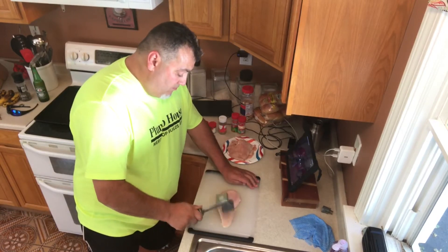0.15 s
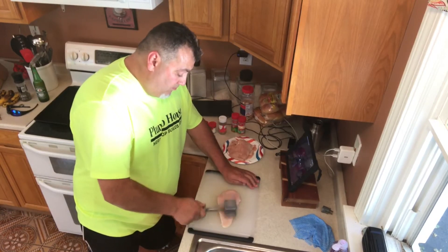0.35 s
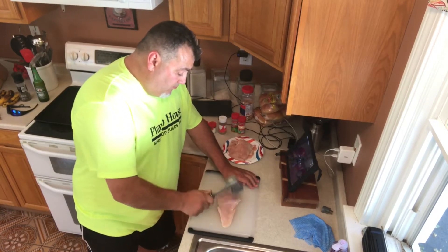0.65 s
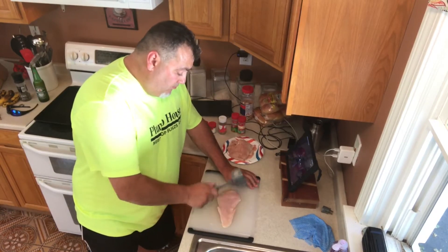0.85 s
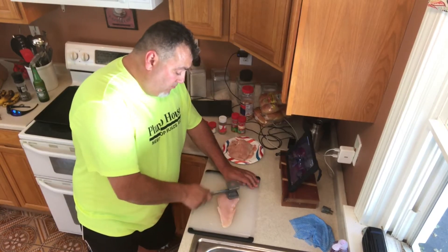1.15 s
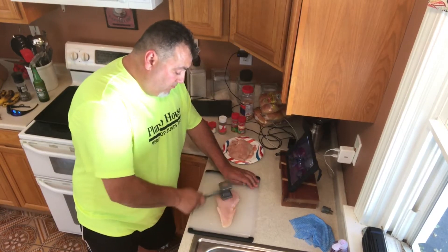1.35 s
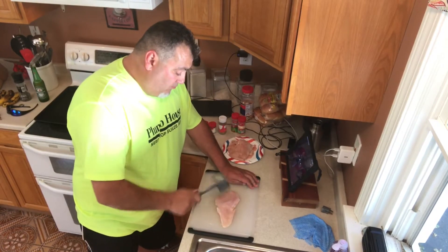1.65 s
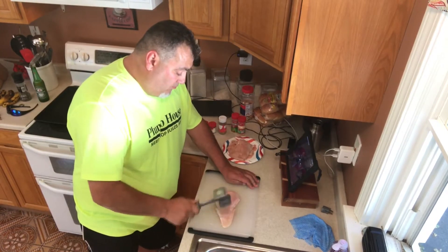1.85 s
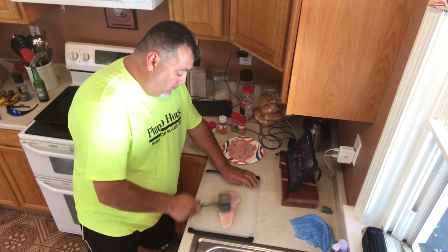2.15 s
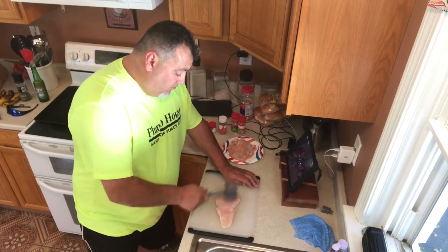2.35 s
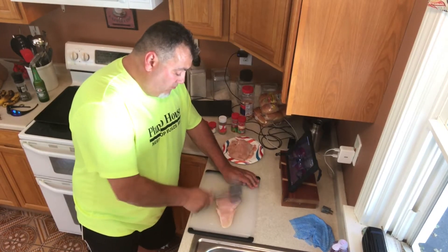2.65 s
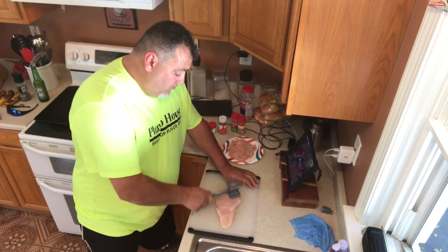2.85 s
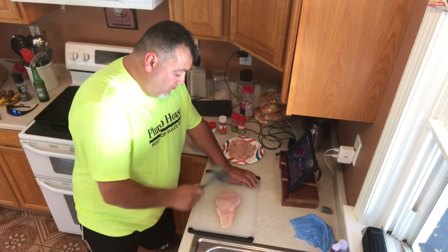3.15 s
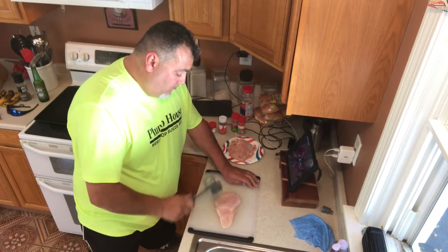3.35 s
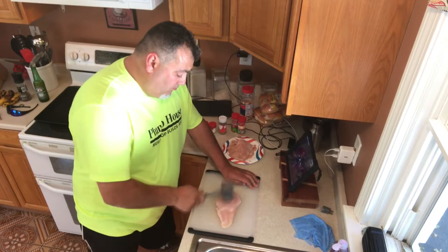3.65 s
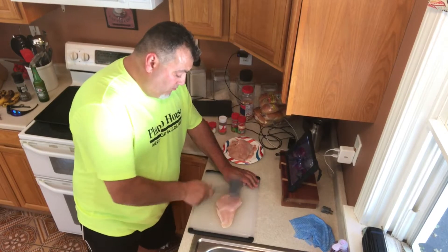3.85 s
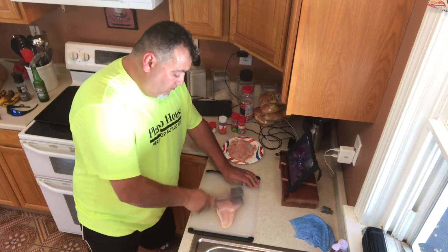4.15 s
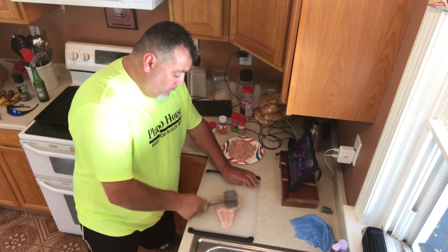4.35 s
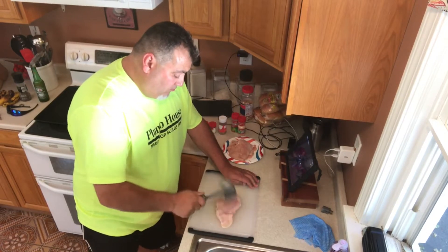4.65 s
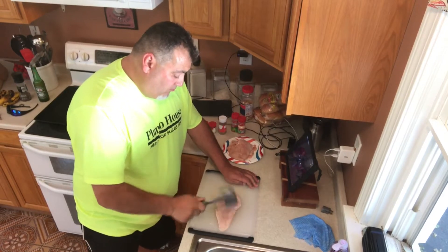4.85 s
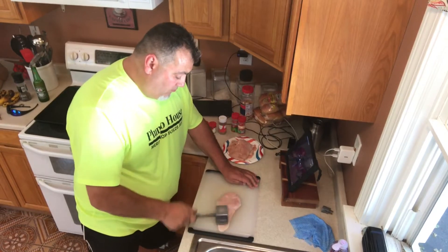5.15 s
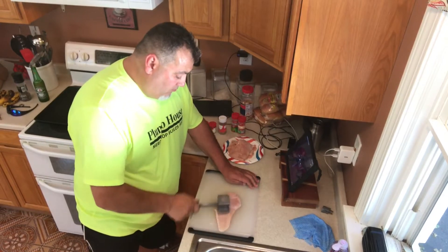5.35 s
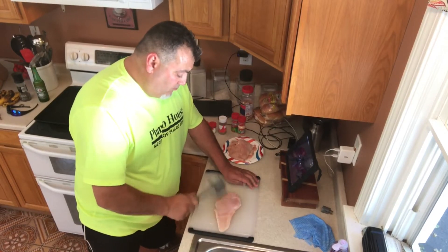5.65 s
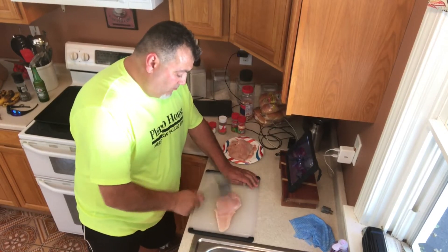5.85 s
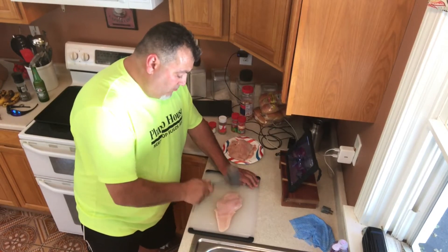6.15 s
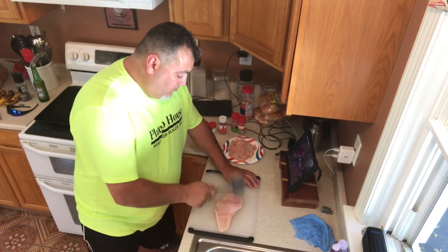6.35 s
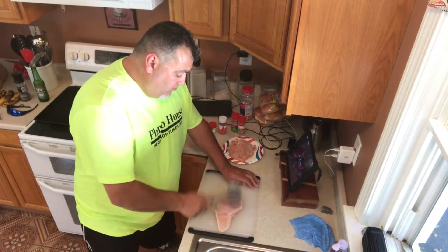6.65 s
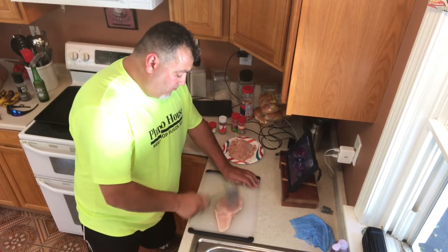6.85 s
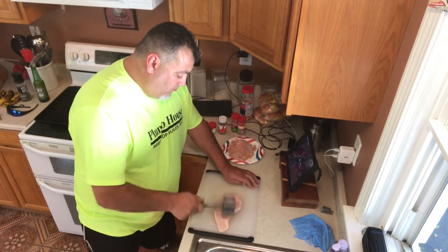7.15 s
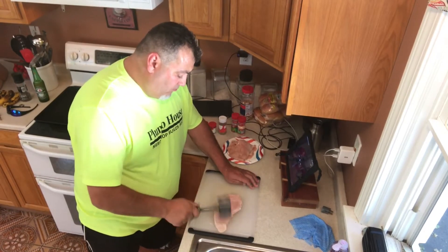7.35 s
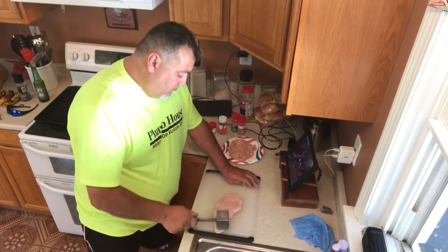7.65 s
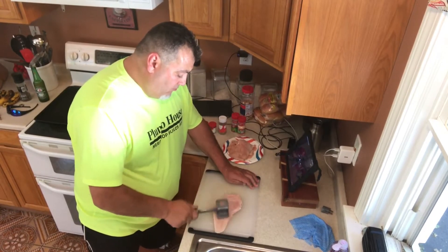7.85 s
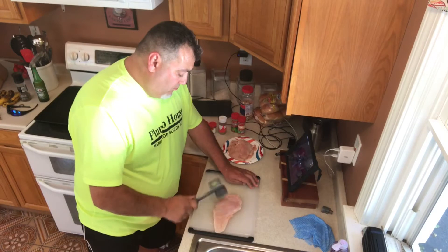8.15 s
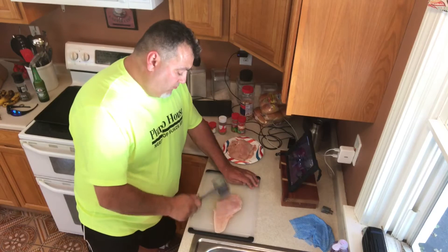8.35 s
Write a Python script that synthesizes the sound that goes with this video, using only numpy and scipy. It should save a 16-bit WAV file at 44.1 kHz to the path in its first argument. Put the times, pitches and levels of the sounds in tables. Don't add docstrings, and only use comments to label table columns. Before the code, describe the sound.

The scene opens on the ringing tail of an earlier blow, and at about 0.1 seconds the next strike lands. A metal meat mallet then pounds raw chicken on a plastic cutting board at roughly five blows a second, nearly regular, through to 8.5 seconds. Every hit combines a wet slap and bright crack, a tiny splashy tick, a hard mid-pitched board knock with quick chatter and rebound, and a short low thud from the counter and cabinet. Loudness and pitch shift slightly from blow to blow. The hits are strongest and wettest around 3.8 to 4.2 seconds, remain firm until about 7, then several become weaker and duller, notably near 7.5, with a brighter hit around 8.3. The microphone is close above the worktop, peaks compressed and extreme treble muted, with faint kitchen reflections and low room hiss between blows.

```python
import sys
import numpy as np
from scipy import signal
from scipy.fft import rfft, irfft, next_fast_len
from scipy.io import wavfile
from scipy.ndimage import uniform_filter1d

SR = 44100
rng = np.random.default_rng(int(sys.argv[2]) if len(sys.argv) > 2 else 0)


def gain_from_decibels(decibels):
    exponent = np.asarray(decibels, float) / 20
    return 10 ** exponent


def to_wav(sig):
    pcm = np.clip(np.atleast_2d(sig), -1, 1) * 32767
    pcm = np.round(pcm).astype(np.int16)
    wavfile.write(sys.argv[1], SR, pcm.T)


N = 374850
LEAD = SR // 5
LONG = N + LEAD
USUAL_CRACK_DB = -13


def colour(x, points):
    size = next_fast_len(len(x))
    hz, db = np.transpose(points)
    bins = np.maximum(np.arange(size // 2 + 1) * SR / size, 1)
    gain = gain_from_decibels(np.interp(np.log(bins), np.log(hz), db))
    return irfft(rfft(x, size) * gain, size)[:len(x)]


def ring(modes, gains, seconds):
    hz, db, t60 = np.transpose(modes)[:, :, None]
    t = np.arange(int(seconds * SR)) / SR
    decay = 1000. ** (-t / t60)
    return np.sum(gains[:, None] * gain_from_decibels(db) * np.sin(2 * np.pi * hz * t) * decay, axis=0)


def add(out, s, sound):
    at = LEAD + int(s * SR)
    out[at:at + len(sound)] += sound[:LONG - at]


def contacts(seconds, density, rise=0.00051):
    t = np.arange(SR // 20) / SR
    clicks = rng.standard_normal(len(t)) * np.exp(-rng.random(len(t)) / density)
    return clicks / np.std(clicks) * np.exp(-(t / seconds) ** 2) * (1 - np.exp(-t / rise))


# (frequency [Hz], level [dB per Hz])
AIR = [(28, -96), (45, -78), (160, -74), (500, -82), (1200, -80), (4000, -90), (9000, -102), (16000, -106)]


def room_air():
    return colour(rng.standard_normal(LONG), AIR) * np.sqrt(SR / 2)


# (frequency [Hz], level [dB], t60 [s])
KITCHEN = [(246, 7.5, 0.29), (455, 3.5, 0.4), (1100, -2.5, 0.44), (2240, -1, 0.43), (4350, -1, 0.47),
           (7800, -4, 0.41), (16000, 0, 0.22)]


def kitchen(x):
    size = next_fast_len(LONG)
    bins = np.maximum(np.arange(size // 2 + 1) * SR / size, 1)
    given, chance = rfft(x, size), rfft(rng.standard_normal(size))
    table_hz, table_db, table_t60 = np.transpose(KITCHEN)
    fill = np.exp(-1 / (0.0025 * SR))
    out = 0
    for hz in 250 * 2 ** np.arange(0, 6.3, .4):
        share = np.cos(np.pi / 2 * np.clip(np.log2(bins / hz) / .4, -1, 1))
        db = np.interp(np.log(hz), np.log(table_hz), table_db)
        t60 = np.interp(np.log(hz), np.log(table_hz), table_t60)
        keep = np.exp(-2 * np.log(1000) / (t60 * SR))
        power = irfft(given * share, size) ** 2
        energy = signal.lfilter([1 - fill], np.convolve([1, -keep], [1, -fill]), power)
        noise = irfft(chance * share, size)
        clumps = np.repeat(rng.standard_normal(size // 800 + 1), 800)[:size]
        clumps = uniform_filter1d(clumps, size=800)
        out = out + gain_from_decibels(db + 1.95 * clumps) * np.sqrt(np.abs(energy)) * noise / np.std(noise)
    return out[:LONG]


# (frequency [Hz], level [dB], t60 [s])
PANEL = [(197.2, 3, 0.57), (444.7, -8.5, 0.78)]


def loose_panel(ring_s):
    free_s, swell_s = 0.063, 0.0075
    panel = ring(PANEL, np.ones(len(PANEL)), ring_s)
    t = np.arange(len(panel)) / SR
    panel = panel * (0.14 + 0.85 / (1 + np.exp((t - free_s) / 0.003)))
    return panel * (1 - np.exp(-t / swell_s))


# (frequency [Hz], level [dB], t60 [s])
FLOOR_MODES = [(50.6, -3.5, 0.41), (61, -17, .3), (73.1, 3, 0.14), (87.3, -17, 0.72), (117, -0.5, 0.17)]


def deep_room(ring_s):
    deep = ring(FLOOR_MODES, np.ones(len(FLOOR_MODES)), ring_s)
    t = np.arange(len(deep)) / SR
    return deep * (1 - np.exp(-(t / 0.0064) ** 2))


# (frequency [Hz], level [dB], t60 [s])
CABINET = [(166.4, 0, 0.44), (240, 9.5, 0.034), (260.4, -12, 0.16), (331, -11.5, 0.14), (392, -14.5, 0.53),
           (538, -3, 0.45)]


def cabinet_thuds(rows):
    ring_s, door_hz = .35, 125
    thuds = np.zeros(LONG)
    panel, deep = loose_panel(ring_s), deep_room(ring_s)
    doors = signal.butter(2, door_hz, "high", fs=SR, output="sos")
    push = np.hanning(int(0.0021 * SR))
    settle = int(.0085 * SR)
    for s, _, _, thud_db, _ in rows:
        force = np.zeros(SR // 40)
        force[:len(push)] += push
        force[settle:settle + len(push)] += 1.5 * gain_from_decibels(1.5 * rng.standard_normal()) * push
        cabinet = ring(CABINET, gain_from_decibels(0.92 * rng.standard_normal(len(CABINET))), ring_s)
        cabinet = signal.sosfilt(doors, cabinet + panel) + deep
        thud = signal.fftconvolve(force, cabinet)
        add(thuds, s + 0.0014, gain_from_decibels(thud_db + 6.0) * thud / np.abs(thud).max())
    return thuds


# (frequency [Hz], level [dB], t60 [s])
BOARD = [(770, -11, 0.072), (925, -10, 0.12), (964, -16, 0.051), (1051, -2, 0.042), (1110, -1, 0.071),
         (1210, 7, 0.025), (1330, -2.5, 0.051), (1418, 2.5, 0.033), (1590, -5, 0.019), (1817, -13.5, 0.083),
         (2246, -6, 0.015), (2440, -8.5, 0.024)]


def board_knocks(rows):
    chatter_base_s, chatter_s_per_db = 0.0074, 0.16
    rebound_s, rebound_db = .007, -5
    knocks = np.zeros(LONG)
    board_hz = np.array(BOARD)[:, 0]
    for s, db, crack_db, _, hz in rows:
        chatter_s = chatter_base_s + chatter_s_per_db * (crack_db - db - USUAL_CRACK_DB)
        chatter = contacts(np.clip(chatter_s, .004, .014), density=0.54, rise=0.0021)
        rebound = contacts(0.0058, density=0.38, rise=0.0011)
        chatter = chatter + gain_from_decibels(rebound_db) * np.roll(rebound, int(rebound_s * SR))
        near = gain_from_decibels(-7 * np.minimum(np.abs(np.log2(board_hz / hz)) / 0.081, 1))
        board = ring(BOARD, near * gain_from_decibels(2.3 * rng.standard_normal(len(BOARD))), .1)
        knock = np.diff(signal.fftconvolve(chatter, board))
        add(knocks, s - .0016, gain_from_decibels(db + 17) * knock / np.linalg.norm(knock))
    return knocks


def wet_cracks(rows):
    cracks = np.zeros(LONG)
    tone = [(500, -45), (2000, 2), (4000, 8.5), (7000, 3), (12000, -13)]
    for s, _, crack_db, _, _ in rows:
        crack = colour(contacts(.016, density=0.078, rise=0.00067), tone)
        add(cracks, s - .0008, gain_from_decibels(crack_db - 1.0) * crack)
    return cracks


# (frequency [Hz], level [dB], t60 [s])
FLESH = [(361, 10.5, 0.037), (471, 3, 0.11), (578, -2, 0.13), (687, -14.5, 0.039), (729.4, 6.5, 0.065)]


def slaps(rows):
    touch_lead_s, lead_s_per_db = 0.0018, .0005
    smack_base_db, smack_per_crack = -20, 0.63
    bright, dull = np.zeros(LONG), np.zeros(LONG)
    slab = ring(FLESH, np.ones(len(FLESH)), .15)
    for s, _, crack_db, _, _ in rows:
        touch = s - touch_lead_s - lead_s_per_db * max(USUAL_CRACK_DB - crack_db, 0)
        add(bright, touch, gain_from_decibels(crack_db + 16.5) * contacts(0.0018, density=0.13))
        add(bright, touch, gain_from_decibels(crack_db + 10.5) * contacts(0.012, density=0.058))
        smack = signal.fftconvolve(contacts(0.014, density=0.4, rise=0.0029), slab)
        smack_db = smack_base_db + smack_per_crack * (crack_db - USUAL_CRACK_DB)
        add(dull, s, gain_from_decibels(smack_db + 26.5) * smack / np.linalg.norm(smack))
    edge = [(2000, -30), (6000, -16), (10000, 0), (16000, 0)]
    return colour(bright, edge) + dull


# (time [s], knock level [dB], wet crack level [dB], thud level [dB], board pitch [Hz])
EARLIER_BLOW = [
    (-.09, -3, -15, -16, 1200),
]
FIRST_BLOWS = [(0.085, 0.5, -17.5, -18.5, 1100), (0.253, 2.5, -14.5, -14, 1210),
               (0.417, 1.5, -12, -14.5, 1340), (0.579, 0.5, -13, -15.5, 1270), (0.751, 1.5, -10, -15, 1080),
               (0.961, 0, -13, -17, 1370), (1.179, 1.5, -12.5, -18, 1165), (1.382, -1.5, -10.5, -18.5, 1070),
               (1.59, 2, -10.5, -16, 1060), (1.789, -1.5, -15.5, -18.5, 1110),
               (1.98, 1.5, -13.5, -15.5, 1110), (2.171, 1, -13.5, -19, 1200), (2.352, -3, -16, -20.5, 1450),
               (2.532, 2.5, -9.5, -16, 1040), (2.728, 3, -9.5, -16, 1450), (2.911, -0.5, -12, -20, 1020),
               (3.099, 0, -10.5, -17.5, 1210), (3.284, 1, -10, -15.5, 1190), (3.47, 2, -13.5, -19.5, 1210),
               (3.658, -2, -13.5, -19.5, 1270), (3.838, 3.5, -11.5, -16, 1210),
               (4.028, 3.5, -8.5, -18, 1100), (4.222, 1.5, -7, -15, 1050)]
LATER_BLOWS = [(4.416, 1, -12.5, -15.5, 1110), (4.61, -2, -14, -16.5, 1110), (4.801, 1.5, -13, -17.5, 1430),
               (5.0, -1, -16, -16, 1510), (5.197, -1, -15, -17, 1260), (5.383, -1, -15, -21, 1070),
               (5.57, -1, -12, -17.5, 1470), (5.748, 0.5, -10, -16.5, 1100), (5.936, -2.5, -12, -21, 1500),
               (6.124, 2.5, -10.5, -19, 1100), (6.331, 1.5, -9, -16, 1080), (6.537, -3.5, -12.5, -16, 1080),
               (6.738, -1, -11.5, -14.5, 1420), (6.943, -0.5, -13.5, -16, 1370),
               (7.146, -2.5, -17, -20.5, 1480), (7.338, -1.5, -16.5, -18.5, 1210),
               (7.533, -7.5, -23, -17, 1370), (7.719, -5, -18.5, -19, 1210), (7.913, -2, -16, -18, 1440),
               (8.091, -4.5, -14.5, -20, 1420), (8.275, -1.5, -11.5, -18.5, 1160),
               (8.456, -7, -14.5, -19.5, 1030)]


def scene():
    rows = list(EARLIER_BLOW) + list(FIRST_BLOWS) + list(LATER_BLOWS)
    air = room_air()
    thuds = cabinet_thuds(rows)
    close = board_knocks(rows) + wet_cracks(rows) + slaps(rows)
    walls = kitchen(close + gain_from_decibels(-16) * thuds)
    return (close + thuds + gain_from_decibels(-35) * walls + air)[None, LEAD:]


# (frequency [Hz], level [dB])
MICROPHONE = [(1000, 3), (5000, 0.5), (7000, 1), (10400, -19.5), (11500, -16), (15000, -16.5), (15950, -33),
              (16100, -50)]


def roll_off(x):
    return signal.sosfilt(signal.butter(12, 16820, fs=SR, output="sos"), x)


def record(dry):
    heard = colour(dry[0], MICROPHONE)[None]
    bass_cut = signal.butter(6, 42, "high", fs=SR, output="sos")
    heard = gain_from_decibels(-2.5) * signal.sosfilt(bass_cut, heard)
    ceiling, knee = .93, 4
    held = heard / (1 + np.abs(heard / ceiling) ** knee) ** (1 / knee)
    top_cut = signal.ellip(8, .2, 60, 16650, fs=SR, output="sos")
    held = signal.sosfilt(top_cut, held)
    return roll_off(held)


dry = scene()
out = record(dry)
to_wav(out)
```